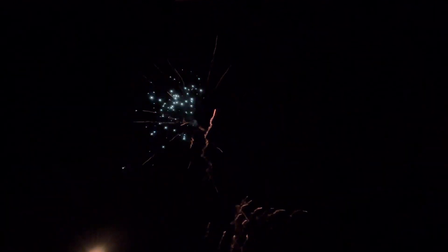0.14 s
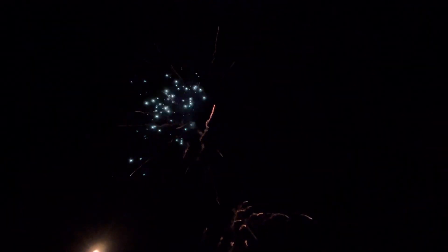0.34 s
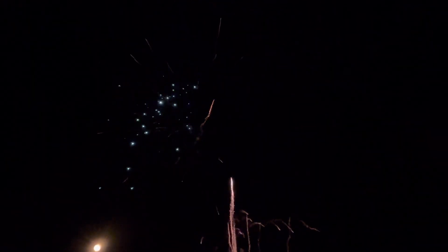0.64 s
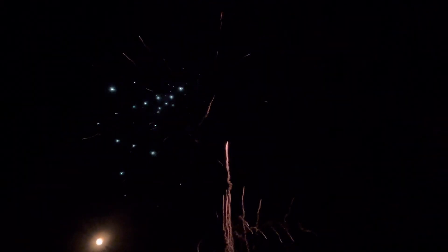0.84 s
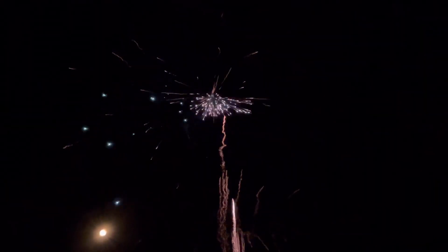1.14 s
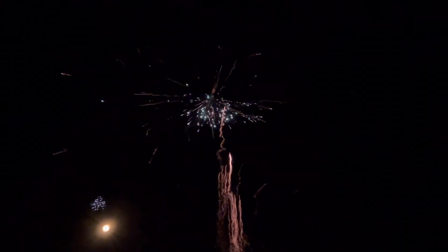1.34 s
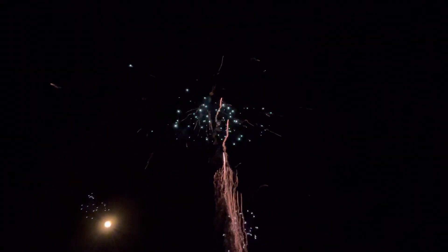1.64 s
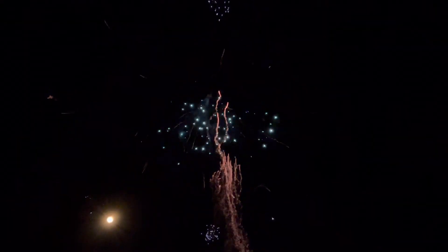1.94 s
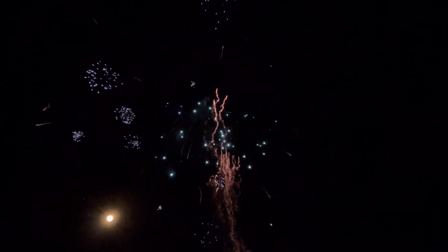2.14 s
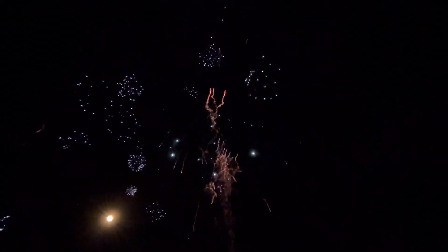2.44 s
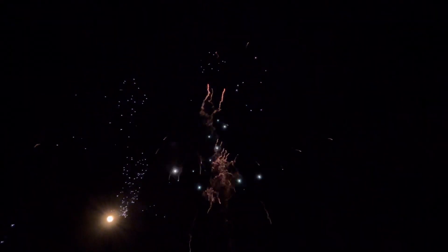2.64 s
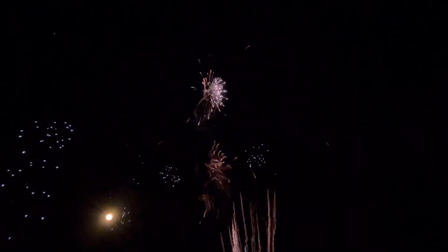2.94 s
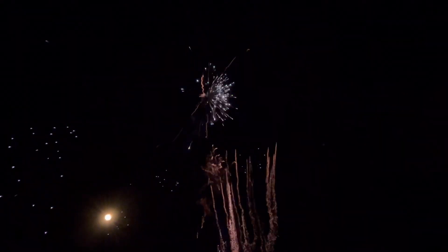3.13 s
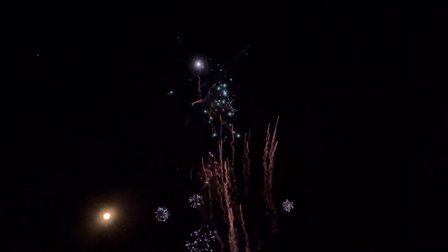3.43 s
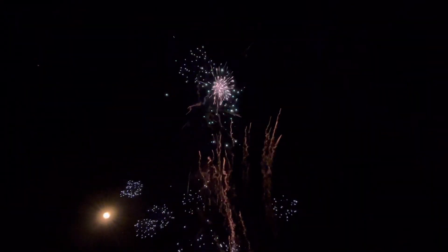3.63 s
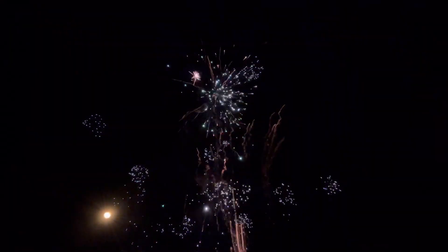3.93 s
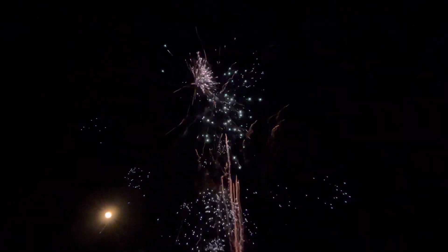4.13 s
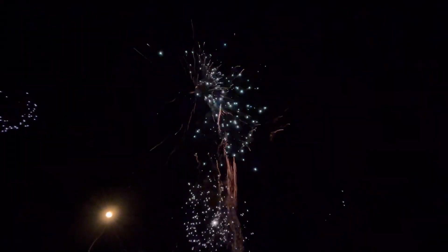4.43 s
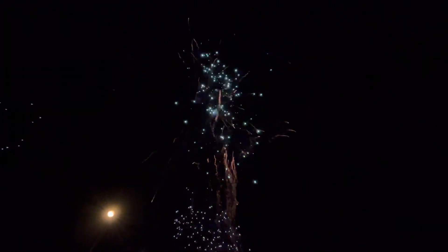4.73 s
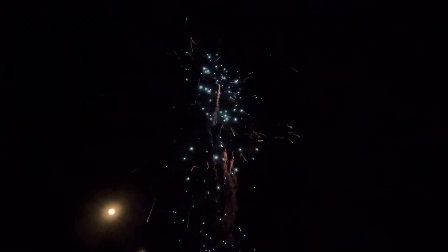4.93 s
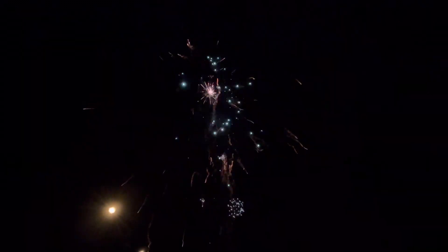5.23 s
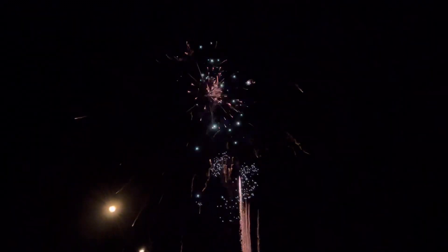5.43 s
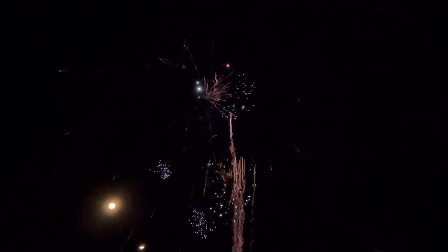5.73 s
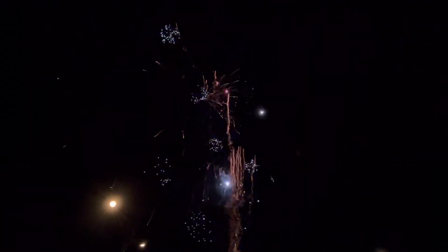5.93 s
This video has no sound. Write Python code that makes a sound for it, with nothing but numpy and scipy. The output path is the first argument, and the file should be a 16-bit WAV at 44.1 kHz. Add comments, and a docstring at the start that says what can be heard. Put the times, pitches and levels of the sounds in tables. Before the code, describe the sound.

Outdoors at night, a multi-shot firework cake goes off between houses. An earlier shell still rolls as a faint star pops, then quick shell bursts crack and boom. Tube lifts thump after brief hisses, crackling stars grow dense in the middle, and the loudest bursts come around four seconds. Fences and walls throw everything back. A stereo microphone stands fairly close, its loud peaks slightly squeezed.

```python
"""Night, a firework cake between houses: as we come in, an earlier shell still rolls and a first star pops.
Shells burst overhead from 0.12 s, cracking on a deep boom; tube lifts thump from 0.31 s, each led by a hiss.
Crackling stars run on to 6.06 s. Ragged spikes make the blasts; delayed copies and decaying noise return them.
Two microphone ports hear it with phase and level offsets, over night air; bass comes late, peaks are squeezed."""
import sys
import numpy as np
from scipy import signal
from scipy.fft import rfft, irfft, next_fast_len
from scipy.io import wavfile
from scipy.ndimage import map_coordinates

SR = 44100
rng = np.random.default_rng(int(sys.argv[2]) if len(sys.argv) > 2 else 0)


def field_ratio(decibels):
    """Amplitude ratio for a level in dB (20 dB per decade); scalars and array-likes work."""
    return 10 ** (np.asarray(decibels, dtype=float) / 20)


def log_audio(samples):
    """Write samples as a 16-bit WAV file to the path given in sys.argv[1]."""
    # one column per channel
    frames = np.atleast_2d(samples).T
    # limit to full scale, then quantise
    limited = np.clip(frames, -1, 1)
    pcm = np.round(limited * 32767).astype(np.int16)
    wavfile.write(sys.argv[1], SR, pcm)


N = 267687

# Levels of blasts and returns are relative: the spectra and offsets below act on them too.
# Shells bursting overhead. Each row: start in seconds, crack in dB, boom in dB, ground delay in ms, echo in dB.
SHELL_BURSTS = [(0.1226, -18.5, -6.5, 4.15, -23), (0.275, -15.5, -7, 4.2, -18.5),
                (0.572, -11, -2.2, 6.36, -19), (1.0506, -8.5, -1, 10.6, -21), (2.9608, -8.5, 0, 9.7, -19),
                (3.6924, -5.5, 0.5, 10.6, -17.5), (4.0987, -4, 2.5, 11, -19.5),
                (5.364, -6.5, -1.5, 11, -18.5)]
# Colour of a shell's crack. Each row: frequency in Hz, level in dB.
SHELL_CRACK_COLOUR = [(300, 5), (625, 28), (1400, 21.5), (2500, 21), (4400, 14), (6000, 18), (9000, 3),
                      (15000, 3)]
# Colour of a shell's boom. Each row: frequency in Hz, level in dB.
SHELL_BOOM_COLOUR = [(40, 18), (150, 20), (300, 30), (480, 27.5), (900, 14.5), (1800, -11), (4000, -72)]
# A boom's returns off fences and walls. Each row: delay in ms, level in dB.
BOOM_RETURNS = [(17, -7.5), (22, -12.5), (32, -12), (42, -8), (51, -18)]
# Lift charges in the tubes. Each row: start in seconds, crack in dB, thump in dB, echo in dB.
LIFT_CHARGES = [(0.313, -5.5, -10.5, -22.5), (0.9336, -9.5, -15.5, -21), (1.264, -9.5, -13, -20),
                (2.7871, -5.5, -8, -19.5), (3.7352, -7, -13, -25), (5.2034, -6.5, -10.5, -22.5)]
# Colour of a lift's crack and hiss. Each row: frequency in Hz, level in dB.
LIFT_CRACK_COLOUR = [(40, 22.5), (150, 24.5), (400, 23), (800, 24.5), (1400, 16.5), (2500, 11),
                     (5000, 19.5), (9000, 4.5), (15000, 0)]
# The cake stays put, so every lift crack returns off the same ground, fences and walls.
# Each row: delay in ms, level in dB, treble limit in Hz.
LIFT_RETURNS = [(0, 5, 16000), (6.54, -3, 7000), (17.75, -12, 790), (28.26, 0, 620), (41.45, -10, 12000),
                (64.3, -12, 6100), (70.93, 4.5, 730), (75.1, -11, 4800), (79.2, -14, 2000),
                (91.6, -16, 1700), (137, -18.5, 3700), (172, -8.5, 4400), (217, -16.5, 5100)]
# The tube's thump, thrown to and fro between house fronts. Each row: delay in ms, level in dB.
THUMP_RETURNS = [(0, 1.7), (16.1, -4.5), (62.5, -3.5), (111.5, -14), (168.5, -2), (227.5, -3),
                 (320.5, -4.5), (385.5, -5), (484.5, -9.5), (544.5, -19), (644.5, -13)]
# Crackling stars, and a wall's sharp answers to some of them about 66 ms later, played alike. Each row: start
# in seconds, crack in dB, ground delay in ms, echo in dB.
CRACKLING_STARS = [(0.0515, -21, 6.5, -21), (0.24, -3, 5.6, -23), (0.211, -52, 5, -36.5),
                   (0.394, -32, 6.5, -30.5), (1.253, -18, 5.7, -27), (0.8589, -25.5, 3.5, -37),
                   (1.4198, -25, 5.1, -28.5), (1.549, -21.5, 10, -31), (1.659, -18, 8, -25.5),
                   (1.6667, -8, 5, -25.5), (1.692, -28, 9.1, -23), (1.709, -33, 6, -37),
                   (1.7601, -10.5, 10, -28.5), (1.7636, -16, 6, -29.5), (1.8605, -18, 8.9, -22),
                   (1.897, -16, 4.7, -28.5), (2.0235, -39, 4.5, -36.5), (1.971, -23, 11.5, -42),
                   (2.194, -18.5, 9.7, -29), (2.232, -28, 9.3, -32), (2.2469, -12, 5.8, -26),
                   (2.259, -16, 8, -50), (2.32, -25, 10.7, -33), (2.367, -19.5, 10.5, -26.5),
                   (2.406, -38, 11, -36.5), (2.448, -19.5, 3.5, -50), (2.4317, -24, 4.5, -30),
                   (2.497, -27, 8.7, -30.5), (2.573, -20, 6.8, -32.5), (2.657, -18.5, 4.5, -36),
                   (2.7345, -29, 4.6, -35), (2.7713, -7, 4.9, -21.5), (3.3441, -23, 4.6, -31.5),
                   (3.4104, -24, 5.7, -32), (3.4885, -26, 5.8, -30), (3.572, -23, 10.3, -25),
                   (3.5898, -17, 4.4, -30), (3.685, -37, 2.7, -29), (3.6565, -15.5, 4.7, -25.5),
                   (3.79, -23, 10.6, -25), (3.895, -26, 5.8, -30.5), (3.922, -19, 4.6, -30),
                   (3.9375, -10, 3.6, -27.5), (3.958, -21, 2.7, -32.5), (3.9865, -24.5, 5, -43),
                   (4.022, -26, 5.7, -33.5), (4.034, -27, 5, -30.5), (4.0544, -17, 5.5, -33),
                   (4.061, -18, 5, -57), (4.138, -19, 7, -25), (4.076, -33, 5.1, -25),
                   (4.151, -23, 3.6, -33), (4.176, -25, 4.5, -27), (4.2217, -26, 6.5, -30.5),
                   (4.2535, -22, 6.9, -23.5), (4.3374, -14.5, 4.8, -29), (4.3873, -22, 5.7, -27),
                   (4.4248, -14.5, 8.4, -26.5), (4.5381, -19, 5, -33.5), (4.649, -22, 4.8, -30),
                   (4.6828, -5, 5.7, -27.5), (4.7503, -17, 5.1, -26.5), (4.8112, -26, 10, -28.5),
                   (4.831, -12.5, 6.3, -29.5), (4.885, -15.5, 5.1, -30), (4.99, -19, 2.8, -33),
                   (5.239, -35, 11.5, -30.5), (5.3302, -24, 3.2, -32), (5.455, -14, 6.3, -34),
                   (5.5935, -24.5, 12.5, -32.5), (5.639, -27, 7, -36), (6.037, -31, 6.6, -40.5),
                   (5.742, -21, 4.2, -27), (5.809, -19, 3.8, -29.5), (5.965, -41, 11.7, -34),
                   (5.985, -24, 12.5, -30.5), (6.0587, -17, 4.9, -27)]
# Colour of everything a star throws out. Each row: frequency in Hz, level in dB.
STAR_COLOUR = [(60, -2), (300, 9.5), (1000, 24), (2500, 16), (5000, 13.5), (9000, 3), (15000, -3)]
# Extra colour of a star's first crack. Each row: frequency in Hz, level in dB.
STAR_CRACK_EDGE = [(500, -5.5), (3000, -2.5), (9000, 4.5), (15000, -2)]
# Stars hang all over the sky, so the ports share them unevenly. Each row: frequency in Hz, likeness from 0 to 1.
STAR_LIKENESS = [(200, 0.9), (600, 0.61), (5000, 0.86), (8000, 0.84)]
# Colour of the echo. Each row: frequency in Hz, stars in dB, lifts in dB, bursts in dB.
ECHO_COLOUR = [(43.6, -55, -32, -37), (96, -23, -5.5, -7.5), (169, -24, -6.5, -13.5),
               (397, -15.5, -2.5, -7), (673, -13, -2, -7), (1455, -7.5, -6.5, -14), (2890, -8.5, -7, -15),
               (5230, -8, -7, -15), (8300, -20.5, -15, -26), (11300, -22.5, -17.5, -23.5),
               (15800, -47, -28, -46)]
# Decay of the echo. Each row: frequency in Hz, near t60 in seconds, far t60 in seconds, far level in dB.
ECHO_DECAY = [(45, 0.035, 3.8, -32), (179, 0.22, 2.33, -13), (670, 0.16, 1.92, -13),
              (2570, 0.21, 1.79, -12), (8100, 0.18, 1.13, -18.5), (14000, 0.054, 0.47, -18)]
# Night air ahead of the ports. Each row: frequency in Hz, level in dB per Hz.
NIGHT_AIR = [(40, -80), (120, -76), (600, -97), (3000, -89), (8000, -104), (15000, -125)]
# The two ports; at_ports() applies 0.975 of each phase and level offset. Each row: frequency in Hz,
# right's lead in radians for blasts overhead, for blasts near the ground and for echo,
# echo likeness from 0 to 1, left over right in dB.
PORT_OFFSETS = [(40, 0, 0, 0, .3, 1), (75, 0, 0, 0, .9, 1.5), (130, -.4, -.1, -.15, .95, -1),
                (272, -.9, -.1, -.25, .8, -1.5), (625, -1.7, -.3, -.9, .4, -4),
                (1080, -2.9, -.2, -2, .45, -3), (1750, -3.7, -.5, -2, .5, -1.5),
                (2500, -4.1, 1.9, -1.4, .4, 0), (3400, -5, 1.2, -1.3, .25, 1),
                (4400, -4, 2.7, -3.1, .55, -1), (5450, -2.6, 3.9, -2.8, .8, -1),
                (6600, -2.5, 4.1, -3, .7, 0), (7400, -1.7, 4.5, -2.2, .5, .5), (8000, -1, 5.3, -.8, .7, 1),
                (9000, -.6, 5.9, -.2, .9, 1), (12500, 0, 6.3, 0, .95, .5), (16200, 2, 8.3, 1, .5, 2)]
# Microphone colour. Each row: frequency in Hz, level in dB.
MICROPHONE_COLOUR = [(4500, 0), (4900, -2.5), (5250, 3), (6200, -0.5), (15300, -4)]
# Limits of the recorded band. Each row: frequency in Hz, level in dB.
BAND_LIMITS = [(22, -29), (40, -0.5), (15800, -1), (16600, -16), (16800, -60)]

GROUND_DULL_HZ = 4970  # treble limit of a shell crack's ground bounce and of a star's body
FLUTTER_S = 0.12  # delay of the far house front's answer


def bursts():
    """Shells burst high and close or low and far; the late ground bounce marks the close ones."""
    rows = np.array(SHELL_BURSTS)
    high = rows[:, 3] > 8  # ground delay in ms
    close, close_echo = shells(*rows[high].T, top_hz=SR)
    distant, distant_echo = shells(*rows[~high].T, top_hz=3600)
    return close, distant, close_echo, distant_echo


def shells(s, crack_db, boom_db, ground_ms, echo_db, top_hz):
    """A crack on a deep boom, again at once off a hard surface by the microphone, then ground, fences, walls."""
    twin, ground = s + 0.0025, s + ground_ms / 1000
    cracks = train(s, crack_db, 0.0004, rough=0.15)
    cracks += train(twin, crack_db - 3.5, 0.0004, rough=0.15)
    bounce = train(ground, crack_db - 1.5, 0.00061, rough=0.28)
    cracks = dulled(cracks + dulled(bounce, GROUND_DULL_HZ), top_hz)

    clean = 0.02  # a boom's front has almost no ragged wake
    graze_db = 9.5 - 0.87 * ground_ms  # ground bounce: strong from low far shells, weak from high ones
    booms = train(s, boom_db, 0.0005, rough=clean)
    booms += train(twin, boom_db - 1.5, 0.00062, rough=clean)
    booms += train(ground, boom_db + graze_db, 0.00046, rough=clean)
    for ms, return_db in BOOM_RETURNS:
        booms += train(s + ms / 1000, boom_db + return_db, 0.00053, rough=0.16)

    echo_feed = echo_power(s, echo_db - 4.5) + echo_power(ground, echo_db + 1.5)
    return coloured(cracks, SHELL_CRACK_COLOUR) + coloured(booms, SHELL_BOOM_COLOUR), echo_feed


def lifts():
    """Each charge cracks and rings the tube; the same surfaces throw both back every time."""
    tube_ground_s, wall_s = 0.00555, 0.0663
    s, crack_db, thump_db, echo_db = np.transpose(LIFT_CHARGES)
    cracks = filtered(train(s, crack_db, 0.0003, rough=0.066), crack_returns)
    cracks += vent(s, crack_db - 20.5)
    thumps = filtered(train(s, thump_db, 0.00034, rough=0.044), tube_thump)
    near = echo_power(s, echo_db - 12)
    near += echo_power(s + tube_ground_s, echo_db - 2.0)
    near += echo_power(s + wall_s, echo_db - 4.5)
    late = echo_power(s + FLUTTER_S, echo_db - 9)
    late += echo_power(s + FLUTTER_S + wall_s, echo_db - 34)
    return coloured(cracks, LIFT_CRACK_COLOUR) + thumps, near, late


def crack_returns(hz):
    """Response of the ground, fences and walls: delayed copies, each with its own treble loss."""
    return sum(field_ratio(db) * delay(hz, ms) / (1 + (hz / top_hz) ** 2) for ms, db, top_hz in LIFT_RETURNS)


def tube_thump(hz):
    """The tube as two equal resonances in a row, its thump repeated between the house fronts."""
    centre_hz, width_hz, gain_db = 123.3, 37.6, 42  # width of each resonance
    resonance = 1j * hz * width_hz / (centre_hz ** 2 - hz ** 2 + 1j * hz * width_hz)
    return field_ratio(gain_db) * resonance ** 2 * sum(field_ratio(db) * delay(hz, ms) for ms, db in THUMP_RETURNS)


def vent(times, db):
    """Gas hisses from the tube just before the shell leaves: noise swelling exponentially up to each lift."""
    rise_s = 0.0034
    rise = np.exp(-np.arange(SR // 40)[::-1] / (rise_s * SR))
    starts = np.round(times * SR).astype(int) - len(rise)
    swell = signal.fftconvolve(np.bincount(starts, field_ratio(db), N), rise)[:N]
    return swell * rng.standard_normal(N)


def stars():
    """Each star cracks on a duller body, bounces off the ground and throws sparks; a far house front answers."""
    s, crack_db, ground_ms, echo_db = np.transpose(CRACKLING_STARS)
    ground = s + ground_ms / 1000
    cracks = coloured(train(s, crack_db, 0.00048), STAR_CRACK_EDGE)
    body = dulled(train(s, echo_db + 9, 0.00033), GROUND_DULL_HZ)
    bounce = dulled(train(ground, echo_db + 13, 0.0002, rough=0.29), 7740)
    fronts = cracks + sparks(s, ground, echo_db) + body + bounce
    near = echo_power(s, echo_db - 2.5) + echo_power(ground, echo_db - 7.0)
    return coloured(fronts, STAR_COLOUR), near, echo_power(s + FLUTTER_S, echo_db - 37)


def sparks(s, ground, echo_db):
    """Nine small cracks trail each star at random lags, weaker the later they come."""
    lag_s, spread_db, fade_db_per_s = 0.018, 3.5, 243  # lags are half-normal, lag_s is their scale
    chance = rng.standard_normal((2, len(s), 9))
    times = np.minimum(ground[:, None] + lag_s * np.abs(chance[0]), N / SR)
    db = echo_db[:, None] + 7 + spread_db * chance[1] - fade_db_per_s * (times - s[:, None])
    return dulled(train(times.ravel(), db.ravel(), 0.00024, rough=0.2), 9500)


def echo(feeds):
    """Scattered returns: noise bands with a near and a far decay, lumpy where single objects answer."""
    centres, *colours = np.transpose(ECHO_COLOUR)
    # a second, duller set for the far house front and far shells: 2.5 dB lost per kHz
    colours += [colour - 2.5 * centres / 1000 for colour in colours]
    hz0, near_s, far_s, far_db = np.transpose(ECHO_DECAY)
    noise, out = rng.standard_normal((2, N)), np.zeros((2, N))
    lumps = field_ratio(2.62 * wobble(100, order=1))
    rolls = field_ratio(1.3 * wobble(1300, order=1))
    for k, centre in enumerate(centres):
        fed = sum(field_ratio(colour[k]) ** 2 * feed for colour, feed in zip(colours, feeds))
        near = dying(fed, along(hz0, near_s, centre)) * lumps ** 2
        far_gain = field_ratio(along(hz0, far_db, centre)) ** 2
        far = dying(fed, along(hz0, far_s, centre)) * far_gain * rolls ** 2
        # neighbouring bands cross over evenly in power
        band = filtered(noise, lambda hz: np.sqrt(along(centres, np.arange(len(centres)) == k, hz)))
        flicker = field_ratio(2.86 * wobble(600, order=1))
        out += np.sqrt(np.abs(near + far)) * flicker * band / band.std()
    return out


def echo_power(times, db):
    """Echo power fed in at each blast, smeared by an exponential of a third of a millisecond."""
    fed = np.bincount(np.round(np.asarray(times) * SR).astype(int), field_ratio(db) ** 2, N + SR)[:N]
    keep = np.exp(-1 / (0.00033 * SR))
    return signal.lfilter([1 - keep], [1, -keep], fed)


def dying(fed, t60):
    """Power that falls by 60 dB in t60 seconds after it is fed in."""
    return signal.lfilter([1], [1, -np.exp(-2 * np.log(1000) / (t60 * SR))], fed)


def night_air():
    """The steady background: coloured noise, scaled so that its spectrum reads per Hz."""
    return coloured(rng.standard_normal((2, N)), NIGHT_AIR) * np.sqrt(SR / 2)


def train(times, db, ragged_s, rough=0.31):
    """Blast fronts: a spike with a short ragged wake, new each time."""
    out, t = np.zeros(N + SR), np.arange(SR // 200) / SR
    wake = rough * rng.standard_normal((len(times), len(t))) * np.exp(-t / ragged_s)
    wake[:, 0] = 1
    for s, level, front in zip(times, db, wake):
        out[round(s * SR):][:len(t)] += field_ratio(level) * front
    return out[:N]


def wobble(step, order):
    """A random curve through a new normal draw every step samples."""
    return map_coordinates(rng.standard_normal(N // step + 4), [np.arange(N) / step], order=order)


def along(hz_points, values, hz):
    """Values read off a log-frequency axis."""
    return np.interp(np.log(hz + 1), np.log(np.asarray(hz_points) + 1), values)


def filtered(x, response):
    """x times a complex response of frequency."""
    m = next_fast_len(N + SR // 2)
    return irfft(rfft(x, m) * response(np.fft.rfftfreq(m, 1 / SR)), m)[..., :N]


def coloured(x, spectrum):
    """x through a spectrum of Hz and dB."""
    return filtered(x, lambda hz: field_ratio(along(*np.transpose(spectrum), hz)))


def dulled(x, top_hz):
    """x with the treble rolled off above top_hz, where it is 6 dB down."""
    return filtered(x, lambda hz: 1 / (1 + (hz / top_hz) ** 2))


def delay(hz, ms):
    """Response of a path that takes ms milliseconds longer."""
    return np.exp(-2j * np.pi * hz * ms / 1000)


def at_ports(shared, own, column, alike):
    """Left and right ports: a shared sound offset in phase and level, and an own part of opposite sign."""
    hz0, *port = np.transpose(PORT_OFFSETS)

    def side(sign):
        def offset(hz):
            level = field_ratio(sign * along(hz0, port[4], hz) / 2)
            return level * np.exp(-0.5j * sign * along(hz0, port[column], hz))

        def turn(hz):
            return np.arccos(np.clip(alike(hz), 0, 1)) / 2

        common = filtered(shared, lambda hz: offset(hz) * np.cos(turn(hz)))
        return common + sign * filtered(own, lambda hz: offset(hz) * np.sin(turn(hz)))

    return np.array([side(0.92), side(-1.03)])


def scene():
    """Shells and lifts arrive alike at both ports; stars, echo and night air less so."""
    close, distant, burst_echo, far_echo = bursts()
    lift, lift_echo, lift_late = lifts()
    star, star_echo, star_late = stars()
    before = echo_power([0], [-30])  # a shell that burst just earlier still rolls
    # three feeds in the echo's full colours, then three in the duller ones
    diffuse = echo([star_echo, lift_echo, burst_echo, star_late, lift_late + before, far_echo])
    diffuse += night_air()
    leaning = wobble(1000, order=3)  # the stars' balance between the ports wanders

    def same(hz):
        return 1 + 0 * hz

    def star_alike(hz):
        return along(*np.transpose(STAR_LIKENESS), hz)

    def echo_alike(hz):
        return along(*np.transpose(PORT_OFFSETS)[[0, 4]], hz)

    out = at_ports(close, close, column=0, alike=same)
    out += at_ports(lift + distant, lift, column=1, alike=same)
    out += at_ports(star, leaning * star, column=0, alike=star_alike)
    return out + at_ports(*diffuse, column=2, alike=echo_alike)


def late_bass(x):
    """An all-pass sweep: below 3500 Hz sound comes later the lower it is, by at most about 1.25 cycles."""
    def sweep(hz):
        share = np.minimum((hz + 30) / 3500, 1)
        return np.exp(-2j * np.pi * 1.5 * (np.log(share) + 1 - share))

    return filtered(x, sweep)


def squeezed(x):
    """Rounds the loudest peaks off smoothly towards a ceiling."""
    ceiling = 0.95
    return x / (1 + np.abs(x / ceiling) ** 4) ** (1 / 4)


def band_limit(x):
    """A steep low-pass at the top of the band."""
    return signal.sosfilt(signal.butter(12, 16810, fs=SR, output="sos"), x)


def record(dry):
    """The microphone colours the sound, the chain delays its bass, squeezes its peaks and limits its band."""
    heard = late_bass(coloured(dry, MICROPHONE_COLOUR))
    mix = coloured(squeezed(heard), BAND_LIMITS)
    return band_limit(mix)


dry = scene()
out = record(dry)
log_audio(out)
```